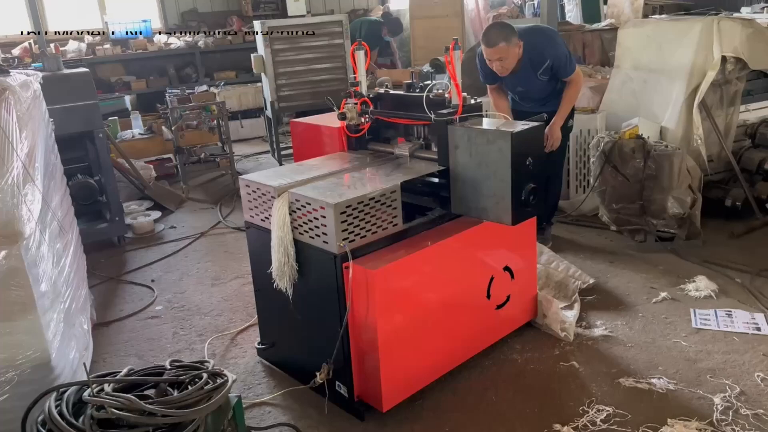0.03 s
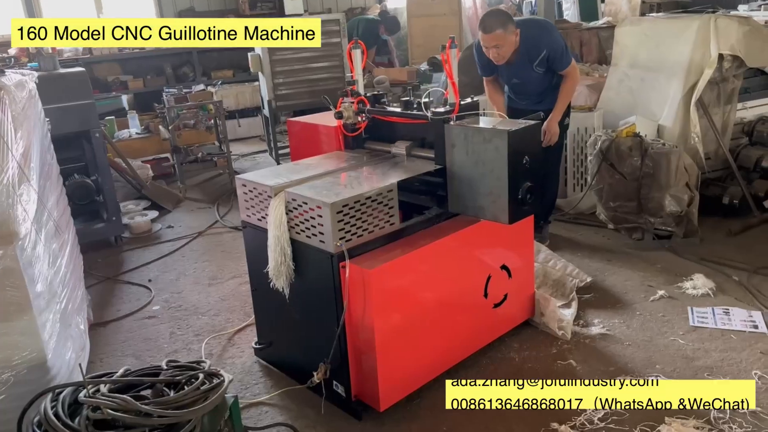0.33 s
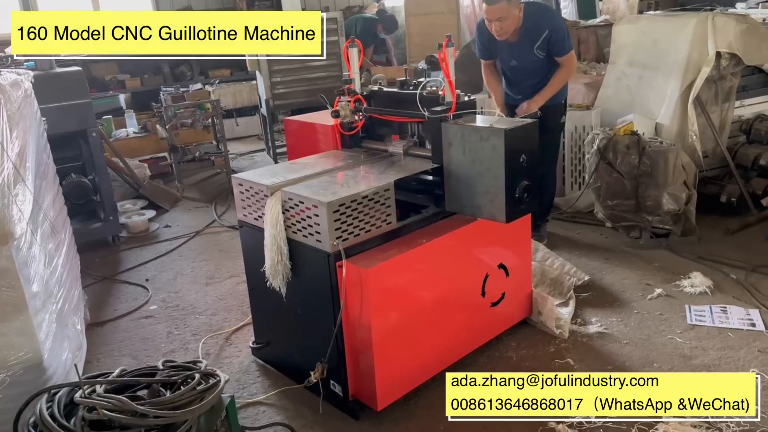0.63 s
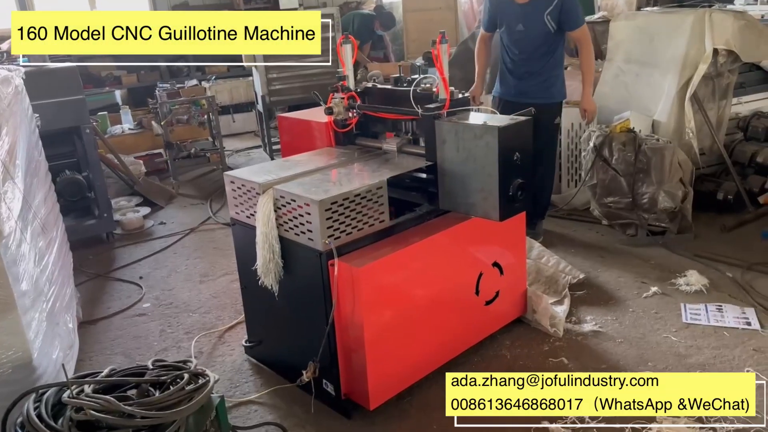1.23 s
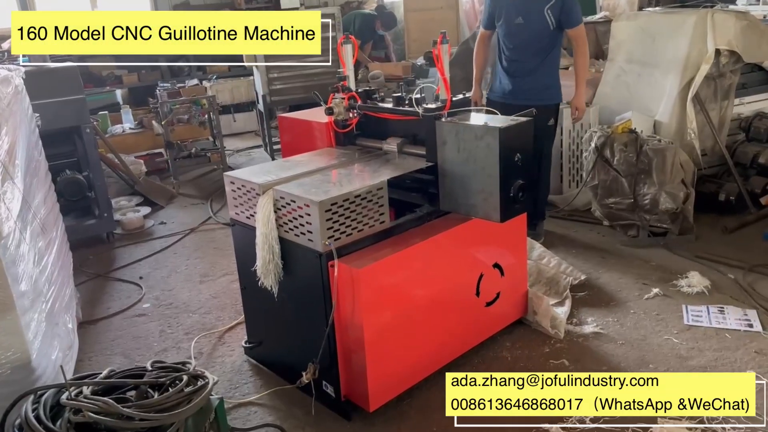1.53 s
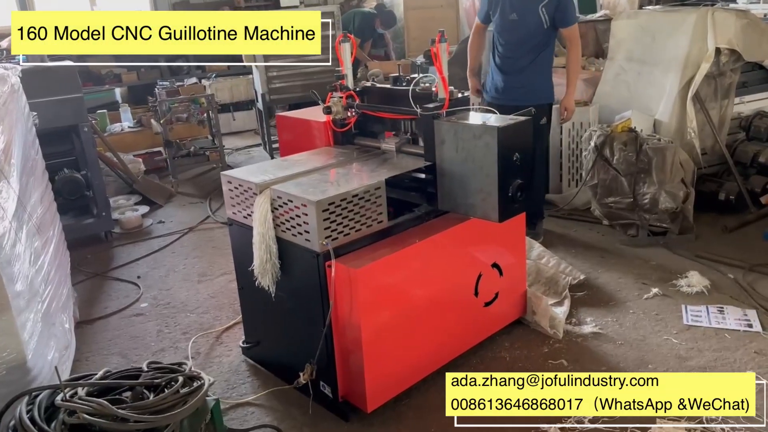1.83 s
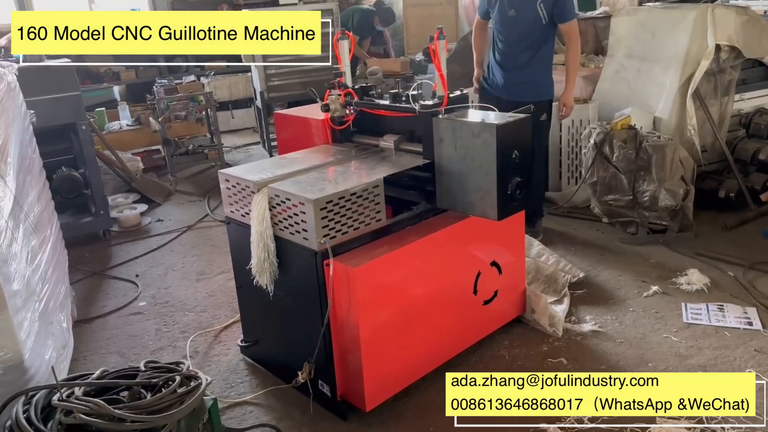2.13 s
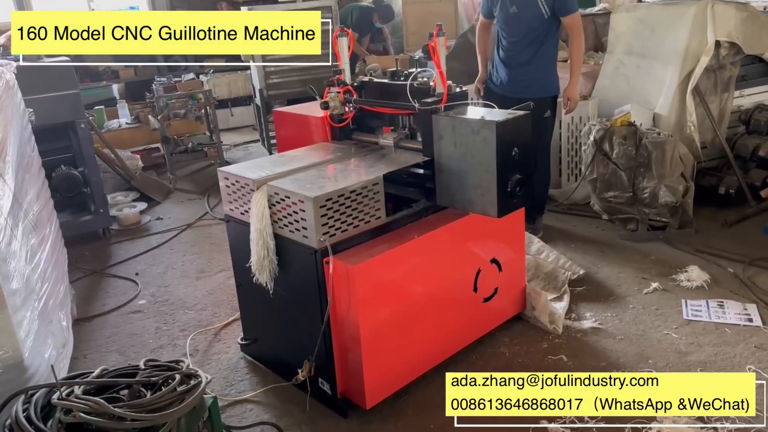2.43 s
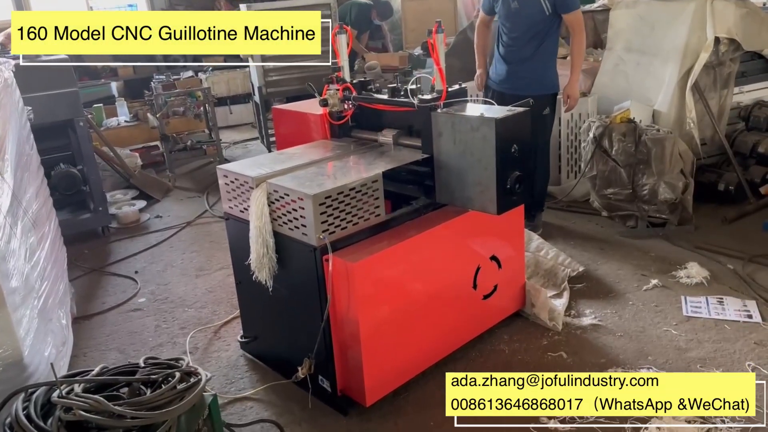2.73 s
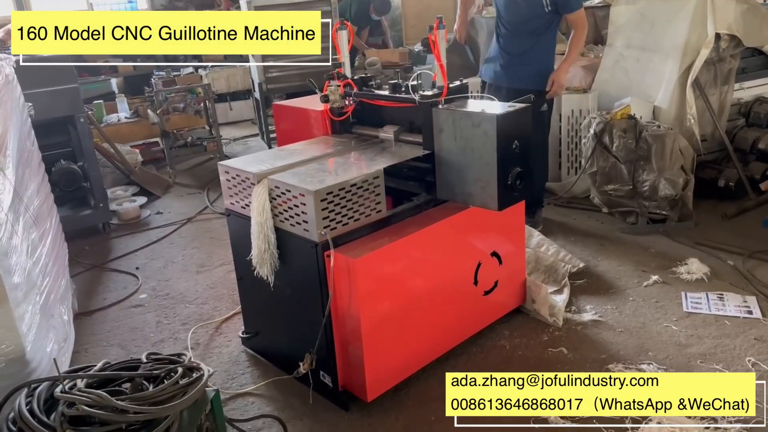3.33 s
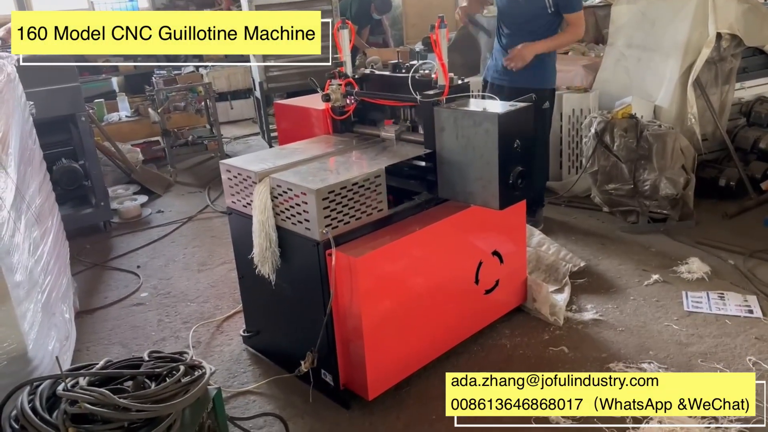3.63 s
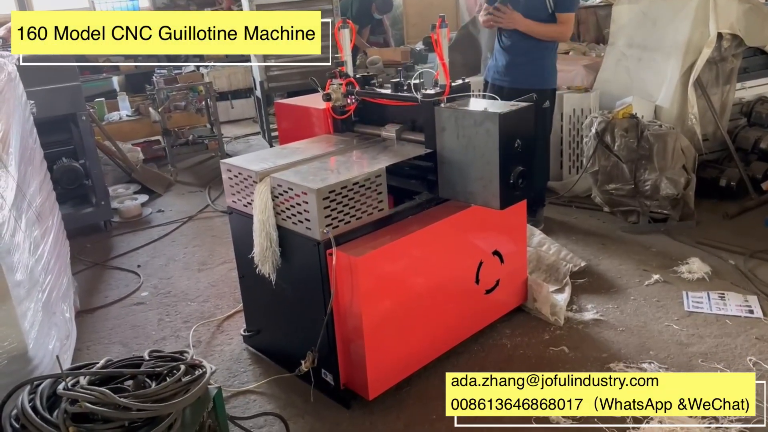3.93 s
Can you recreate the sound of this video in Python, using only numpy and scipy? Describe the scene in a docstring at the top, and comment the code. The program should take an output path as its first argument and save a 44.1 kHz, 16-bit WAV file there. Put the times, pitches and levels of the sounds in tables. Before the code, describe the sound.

A running metal guillotine cutter hums and thumps steadily in a workshop.

```python
"""A guillotine cutter runs in a workshop. From the start its motor hums and whines, its drive rumbles. From
0.35 s a stroke comes every 0.6 s: a dull slap and the same run of soft knocks through the steel frame, with two
bright valve ticks, shaking covers and a short hiss. Scrapes come near 1, 1.5 and 2.8 s. From 2.7 s the loaded
drive churns louder and whirrs, and a rasp climbs through the last scrape. Left and right hear the machine
slightly apart."""
import sys
import numpy as np
from scipy import signal
from scipy.fft import rfft, irfft, next_fast_len
from scipy.io import wavfile
from scipy.ndimage import map_coordinates

SR = 44100
rng = np.random.default_rng(int(sys.argv[2]) if len(sys.argv) > 2 else 0)


def int16_out(signal):
    """Quantize to a 16-bit WAV file."""
    q = np.round(np.clip(np.atleast_2d(signal).T, -1, 1) * 32767)
    wavfile.write(sys.argv[1], SR, q.astype(np.int16))


N = 176400

# Motor tones. Each row: frequency in Hz, level in dB.
HUM_TONES = [(54.5, -38.5), (77, -39.5), (107.7, -51), (183, -40), (360, -43.5), (721.4, -48.5), (899, -55)]
PAIR_TONES = [(1748, -49), (1797, -53)]
HIGH_TONES = [(4893, -65.5), (5712, -64.5), (5835, -67), (5938, -65), (6019, -62), (6062, -60),
              (6158, -66.5), (6202, -67), (6282, -62.5)]
# Swell of the pair and the high tones. Each row: time in seconds, gain in dB.
PAIR_GAIN_DB = [(0, 1.5), (.55, 3), (.72, 9), (.96, 9), (1.05, 1), (1.4, 3), (2.1, 1.5), (2.5, -9),
                (3.2, 2), (4, 1)]
HIGH_GAIN_DB = [(0, 1), (.8, 0.5), (1.4, -1), (2.2, -2.5), (4, -1)]
# Hiss under the high tones. Each row: centre in Hz, half-width in Hz, relative level in dB.
HIGH_HISS_BANDS = [(6110, 180, -7.5), (5880, 130, -6)]
# Motor whine. Each row: time in seconds, pitch in Hz, level in dB, roughness from 0 to 1.
WHINE_TRACK = [(0, 2624, -50, 0.3), (1.1, 2616, -45.5, 0.17), (2, 2626, -47, .25), (2.35, 2597, -50, .8),
               (2.9, 2610, -44.5, 1), (3.2, 2605, -44, .9), (3.52, 2586, -43, .8), (3.65, 2626, -53, .8),
               (4, 2690, -51, 0.88)]

# Noise colours. Each row: frequency in Hz, relative spectral density in dB.
DRIVE_SPECTRUM = [(22, -39.5), (36, -10), (55, -7.5), (90, 1), (170, -1), (230, -2), (400, -2.5), (520, -4),
                  (640, -8.5), (900, -10.5), (1400, -9.5), (2000, -17), (2600, -18), (3400, -26.5),
                  (5000, -30), (6400, -29), (7100, -36), (9800, -37.5), (11000, -60.5), (13000, -46),
                  (14500, -45), (15800, -51)]
TICK_SPECTRUM = [(3000, -12), (7000, -7), (8400, -2), (9600, -0.5), (11500, -10), (13000, -11),
                 (14400, -16), (15700, -4.5)]
SLAP_SPECTRUM = [(120, -25.5), (280, -6), (560, -1.5), (700, -6.5), (1200, -8), (2200, -24), (5000, -48)]
SHUDDER_SPECTRUM = [(30, -33), (70, -32), (110, 3.5), (220, -12), (330, -6), (480, 1), (570, -7),
                    (660, -10.5), (1200, -11), (2000, -19.5), (4000, -31), (8000, -64)]
HISS_SPECTRUM = [(1500, -11.5), (3500, -1.5), (7000, -1), (9500, 4.5), (11500, -24), (13000, -4),
                 (14400, 2), (15700, 2.5)]
CHURN_SPECTRUM = [(120, 2), (270, -7.5), (420, -25), (620, -7), (830, 1), (1250, -3.5), (2000, -11),
                  (3300, -16.5), (5000, -25.5), (8000, -53)]
SCRAPE_SPECTRUM = [(1500, -16.5), (2500, 2), (3500, -1), (4800, -7.5), (9000, -13.5), (12000, -39.5)]
# Ringing steel parts. Each row: centre in Hz, half-width in Hz, relative level in dB.
TICK_RESONANCES = [(8370, 200, -6), (14160, 350, -3.5)]
CHURN_RESONANCES = [(411, 40, -5), (461, 47, -14), (713, 21, -8), (811, 6.1, -9.5), (904, 24, -4.5),
                    (980, 74, -15), (1420, 24, -14.5), (1552, 19, -9.5)]
ROUGH_RESONANCES = [(1140, 26, -1), (1175, 20, 0)]

# Valve ticks. Each row: start in seconds, level in dB, hold in seconds, ring over grit in dB.
VALVE_TICKS = [(0.333, -39.5, 0.014, -9.5), (0.399, -39, 0.0087, -8), (0.938, -39, 0.0094, -7),
               (1, -43, 0.0085, 0), (1.456, -46, .003, -17), (1.536, -38.5, 0.011, -7),
               (1.606, -42, 0.009, -5), (2.133, -40.5, 0.013, -8), (2.203, -39, 0.012, -4.5),
               (2.736, -39.5, 0.01, -2), (2.8, -35, 0.014, -8), (3.334, -42.5, .01, -1.5),
               (3.404, -39.5, 0.012, -2), (3.936, -41.5, 0.017, -3.5)]
# Cutting strokes. Each row: start in seconds, then gains in dB for impacts, shudder, hiss, first blow.
CUT_STROKES = [(0.3452, -1.5, 0, 2, 2.5), (.946, -3, 1, 0, 3), (1.547, -3.5, 0.5, 0.5, 5),
               (2.1455, -3.5, 0, 1, 4), (2.7464, -1, 2, 2, 0), (3.347, -3.5, 0.5, 2, 2),
               (3.9457, -7, 4, 1, 7)]
# Knocks of one stroke. Each row: delay in seconds, gain in dB, pitch the contact favours in Hz.
STROKE_KNOCKS = [(-0.001, -17.5, 357), (0.0047, -18, 547), (0.0104, -15.5, 434), (0.0116, -23.1, 122),
                 (0.0276, -12.5, 156), (0.0298, -20.5, 422), (0.0414, -22.5, 464), (0.0483, -28.0, 123),
                 (0.0609, -19, 214), (0.067, -18.5, 324), (0.0882, -19, 517), (0.0953, -17, 252),
                 (0.113, -20, 92.4), (0.1215, -24.5, 455), (0.1446, -14.5, 378), (0.1508, -24, 452),
                 (0.1544, -17.5, 257), (0.1759, -20.5, 163), (0.2066, -13, 151.4), (0.2235, -19, 408),
                 (0.245, -23.5, 504), (0.2629, -27, 82), (0.335, -27, 540), (0.4087, -32.5, 307)]
# Modes of frame and covers. Each row: frequency in Hz, gain in dB, T60 in seconds.
FRAME_MODES = [(81.4, -4, 0.14), (88.5, 0.5, 0.13), (107.3, 6.5, 0.21), (127, -23, 0.075), (182, 0.7, 0.25),
               (263, -3.5, 0.18), (292.6, -4, 0.1), (324, 2.7, 0.072), (445.7, 2.5, 0.085),
               (522, -0.5, 0.1), (549, -3.5, 0.11)]

# Swell of the churn and the rough ring. Each row: time in seconds, gain in dB.
CHURN_GAIN_DB = [(0, -60), (.85, -43), (1.1, -37.5), (1.45, -35.5), (1.9, -35.5), (2.3, -40), (2.68, -36.5),
                 (2.86, -27), (3.15, -28.5), (3.5, -28), (3.76, -30.5), (4, -34.5)]
ROUGH_GAIN_DB = [(0, -55), (1.7, -41), (2, -34.5), (2.4, -41.5), (2.8, -36), (3.5, -36.5), (4, -36.5)]
# Scrapes. Each row: start in seconds, level in dB, attack and hold in seconds, fall in dB per second.
BLADE_SCRAPES = [(0.957, -47, 0.0089, 0.13, 34), (1.459, -36.5, 0.0089, 0.04, 137),
                 (2.798, -42, 0.024, 0.22, 39)]
# Gliding whirr and rasp. Each row: time in seconds, pitch in Hz, gain in dB.
WHIRR_TRACK = [(2.699, 413, -72), (2.85, 405, -56), (3.051, 414, -35), (3.201, 412, -42.5),
               (3.351, 416, -42), (3.5, 429.4, -38), (3.701, 425, -42.5), (4, 413.3, -52)]
RASP_TRACK = [(2.72, 3300, -70), (2.744, 3200, -40), (2.79, 3120, -38), (2.81, 3400, -46),
              (2.871, 3690, -46), (2.94, 3600, -49), (3.001, 3950, -53), (3.05, 4050, -50),
              (3.11, 4050, -70)]
# Whirr partials. Each row: multiple of the pitch, gain in dB.
WHIRR_HARMONICS = [(1, 7.8), (2, 1.6)]

# Left-right likeness. Each row: frequency in Hz, coherence from 0 to 1.
COHERENCE = [(40, .97), (130, .91), (260, .76), (500, .33), (1000, .12), (4500, .15), (7000, .25),
             (8500, .5), (9900, .55), (10500, .99), (15000, .99)]
# Left ahead of right. Each row: frequency in Hz, phase in radians.
LEFT_LEAD_RAD = [(20, 0), (200, -.1), (500, -.1), (1800, -2.9), (4800, -6.5), (6030, -11.3), (8440, -12.7),
                 (9900, -13.5), (10400, -15.4), (11400, -15.7), (12300, -16.1), (13300, -18.4),
                 (16000, -18.9)]
# Left over right. Each row: frequency in Hz, level in dB.
BALANCE_DB = [(60, -.6), (200, -.6), (700, .5), (2500, 0), (3300, 1.5), (4400, 6), (6100, 9), (6700, 5),
              (7300, 1), (10000, 0)]
# Workshop decay. Each row: frequency in Hz, T60 in seconds.
ROOM_T60_S = [(100, 0.94), (500, 0.3), (2000, 0.35), (10000, 0.33)]

TIME_S = np.arange(N) / SR
SPLIT = np.array([[.5], [-.5]])  # half to the left, minus half to the right


def amp(db):
    """Decibels to gain."""
    return 10 ** (np.asarray(db) / 20)


def unit(x):
    """Scale to rms 1."""
    return x / np.sqrt(np.mean(x ** 2) + 1e-20)


def along(points, hz):
    """Interpolate (Hz, value) points on a log axis."""
    knots_hz, values = np.transpose(points)
    return np.interp(np.log(hz + 1), np.log(np.sort(knots_hz) + 1), values)


def curve(rows):
    """Interpolate (s, value) points."""
    return np.interp(TIME_S, *np.transpose(rows))


def wobble(rate_hz):
    """Smooth random curve, rate_hz knots a second."""
    return map_coordinates(rng.standard_normal(4096), [TIME_S * rate_hz], mode='wrap')


def envelope(start_s, attack_s, hold_s, fall_db_per_s):
    """Rise, hold, steady fall in dB."""
    age_s = np.maximum(TIME_S - start_s, 0)
    return (1 - np.exp(-age_s / attack_s)) * amp(-fall_db_per_s * np.maximum(age_s - hold_s, 0))


def filtered(x, response):
    """Apply a complex frequency response."""
    size = next_fast_len(N + SR // 2)
    return irfft(rfft(x, size) * response(np.fft.rfftfreq(size, 1 / SR)), size)[..., :N]


def spread_rad(hz):
    """Left-right angle; zero when fully coherent."""
    return np.arccos(np.clip(along(COHERENCE, hz), 0, 1))


def stereo(pair):
    """Two unrelated signals to partly coherent left and right."""
    blend = lambda hz: np.array([np.cos(spread_rad(hz) / 2), np.sin(spread_rad(hz) / 2)])
    pan = lambda hz: amp(SPLIT * along(BALANCE_DB, hz)) * np.exp(1j * SPLIT * along(LEFT_LEAD_RAD, hz))
    mid, side = filtered(pair, blend)
    return filtered(np.array([mid + side, mid - side]), pan)


def noise(spectrum):
    """Coloured stereo noise, rms 1."""
    return unit(stereo(filtered(rng.standard_normal((2, N)), lambda hz: amp(along(spectrum, hz)))))


def ringing(resonances):
    """Stereo noise through narrow resonances, rms 1."""
    response = lambda hz: sum(amp(db) / np.sqrt(width_hz) / (1 + 1j * (hz - centre_hz) / width_hz) ** 2
                              for centre_hz, width_hz, db in resonances)
    return unit(stereo(filtered(rng.standard_normal((2, N)), response)))


def tones(rows, drift_rad, flutter_db, rate_hz):
    """Stereo sines, unsteady in phase and level."""
    out = np.zeros((2, N))
    for hz, db in rows:
        phase = 2 * np.pi * (hz * TIME_S + rng.random()) + drift_rad * wobble(rate_hz)
        apart_rad = SPLIT * spread_rad(hz) * (1 + .5 * wobble(rate_hz))
        level_db = db + flutter_db * wobble(rate_hz) + SPLIT * along(BALANCE_DB, hz)
        out += amp(level_db) * np.sin(phase + apart_rad)
    return np.sqrt(2) * out


def motor():
    """Low hum, a whining pair, thin high tones in a narrow hiss."""
    hum = tones(HUM_TONES, drift_rad=0.77, flutter_db=-2.5, rate_hz=9)
    pair = amp(curve(PAIR_GAIN_DB)) * tones(PAIR_TONES, drift_rad=0.69, flutter_db=3, rate_hz=18)
    high = amp(curve(HIGH_GAIN_DB)) * tones(HIGH_TONES, drift_rad=0.46, flutter_db=5.5, rate_hz=32)
    return hum + pair + high + amp(-57) * ringing(HIGH_HISS_BANDS)


def whine(rough_hz=75, swell_db=2.5):
    """Motor tone that sags and roughens under load."""
    knots_s, *columns = np.transpose(WHINE_TRACK)
    hz, db, roughness = (np.interp(TIME_S, knots_s, column) for column in columns)
    phase = 2 * np.pi * np.cumsum(hz) / SR
    sine, cosine = np.sin(phase), np.cos(phase)
    clean = np.sqrt(2) * np.array([sine, cosine])
    rough = unit(np.array([wobble(rough_hz) * sine + wobble(rough_hz) * cosine for _ in range(2)]))
    tone = np.sqrt(1 - roughness) * clean + np.sqrt(roughness) * rough
    return amp(db + swell_db * wobble(14)) * tone


def drive(level_db=-27.5, rattle_db=1, sway_db=1.08):
    """Running drive: rumble with a fast rattle and a slow sway."""
    return amp(level_db + rattle_db * wobble(58.9) + sway_db * wobble(7.87)) * noise(DRIVE_SPECTRUM)


def valve_ticks(flutter_db=1.5):
    """A valve ticks twice a stroke: grit plus a bright ring."""
    grit, ring = noise(TICK_SPECTRUM), ringing(TICK_RESONANCES)
    out = np.zeros((2, N))
    for start_s, db, hold_s, ring_db in VALVE_TICKS:
        burst = envelope(start_s, attack_s=0.0018, hold_s=hold_s, fall_db_per_s=490)
        out += amp(db) * burst * (grit + amp(ring_db) * ring)
    return out * amp(flutter_db * wobble(300))


def slap(level_db=-25):
    """Dull slap of each stroke's first blow."""
    bursts = sum(amp(db + blow_db) * envelope(start_s, attack_s=0.0011, hold_s=0.0073, fall_db_per_s=700)
                 for start_s, db, _, _, blow_db in CUT_STROKES)
    return amp(level_db) * bursts * noise(SLAP_SPECTRUM)


def frame_knocks(attack_s=0.0022, contact_octaves=0.24, first_blow_s=0.009, scatter_db=0.5, room_db=-16):
    """Each knock rings the frame modes near its pitch; the workshop reverberates."""
    age_s = np.arange(SR // 3) / SR
    hz, db, t60_s = np.transpose(FRAME_MODES)[:, :, None]
    rise = 1 - np.exp(-age_s / attack_s)
    modes = rise * amp(db - 60 * age_s / t60_s) * np.sin(2 * np.pi * hz * age_s)
    out = np.zeros(N + SR)
    for start_s, stroke_db, _, _, blow_db in CUT_STROKES:
        for delay_s, knock_db, pitch_hz in STROKE_KNOCKS:
            coupling = np.exp(-.5 * (np.log2(hz[:, 0] / pitch_hz) / contact_octaves) ** 2)
            force_db = stroke_db + knock_db + blow_db * (delay_s < first_blow_s)
            gains = coupling * amp(force_db + scatter_db * rng.standard_normal(len(modes)))
            out[round((start_s + delay_s) * SR):][:len(age_s)] -= gains @ modes
    return out[:N] + amp(room_db) * workshop(out[:N])


def workshop(x):
    """Room reverberation; bass lasts longest."""
    hz, age_s, spectra = signal.stft(rng.standard_normal((2, SR // 2)), SR, nperseg=256)
    decay = amp(-60 * age_s / along(ROOM_T60_S, hz)[:, None])
    _, tail = signal.istft(spectra * decay, SR, nperseg=256)
    return stereo(signal.fftconvolve(x[None], tail / np.linalg.norm(tail[0]), axes=1)[:, :N])


def cover_shudder(level_db=-28.5, repeat_share=0.23):
    """The covers shake after each stroke, partly the same way every time."""
    same, fresh = noise(SHUDDER_SPECTRUM), noise(SHUDDER_SPECTRUM)
    out = np.zeros((2, N))
    for start_s, _, db, _, _ in CUT_STROKES:
        repeated = np.pad(same, ((0, 0), (round(start_s * SR), 0)))[:, :N]
        shake = np.sqrt(repeat_share) * repeated + np.sqrt(1 - repeat_share) * fresh
        burst = envelope(start_s, attack_s=0.0028, hold_s=0.18, fall_db_per_s=43.5)
        out += amp(level_db + db) * burst * shake
    return out


def blade_hiss(level_db=-44, flutter_db=1.3):
    """Fading hiss of the blade on each stroke."""
    bursts = sum(amp(db) * envelope(start_s, attack_s=0.035, hold_s=0.066, fall_db_per_s=45)
                 for start_s, _, _, db, _ in CUT_STROKES)
    return bursts * amp(level_db + flutter_db * wobble(50)) * noise(HISS_SPECTRUM)


def churn(flutter_db=1.63, steel_db=-4.5):
    """The loaded drive churns and sets steel parts ringing."""
    churning = noise(CHURN_SPECTRUM) * amp(flutter_db * wobble(45))
    steel = amp(steel_db) * ringing(CHURN_RESONANCES)
    rough_ring = amp(curve(ROUGH_GAIN_DB)) * ringing(ROUGH_RESONANCES)
    return amp(curve(CHURN_GAIN_DB)) * (churning + steel) + rough_ring


def blade_scrapes(flutter_db=1.2):
    """The blade scrapes now and then: bursts of rough noise."""
    bursts = sum(amp(db) * envelope(start_s, *shape) for start_s, db, *shape in BLADE_SCRAPES)
    return bursts * amp(flutter_db * wobble(91)) * noise(SCRAPE_SPECTRUM)


def whirr(waver_hz=5.7, flutter_db=3, blur_rad=0.26):
    """Wavering pitch of the loaded drive; echoes blur each side separately."""
    knots_s, hz, db = np.transpose(WHIRR_TRACK)
    phase = 2 * np.pi * np.cumsum(np.interp(TIME_S, knots_s, hz) + waver_hz * wobble(25)) / SR
    out = np.zeros((2, N))
    for channel in out:
        for multiple, partial_db in WHIRR_HARMONICS:
            gain = amp(partial_db + flutter_db * wobble(25))
            channel += gain * np.sin(multiple * phase + blur_rad * wobble(30))
    return amp(np.interp(TIME_S, knots_s, db)) * out


def rasp(half_width_hz=190):
    """Narrow noise band climbing unevenly through the last scrape."""
    knots_s, pitch_hz, db = np.transpose(RASP_TRACK)
    band = filtered(rng.standard_normal((2, N)), lambda hz: 1 / (1 + (hz / half_width_hz) ** 2))
    phase = 2 * np.pi * np.cumsum(np.interp(TIME_S, knots_s, pitch_hz)) / SR
    return np.interp(TIME_S, knots_s, amp(db), left=0, right=0) * unit(band * np.sin(phase))


def scene():
    """The whole machine, in stereo."""
    frame = slap() + frame_knocks() + cover_shudder()
    blade = valve_ticks() + blade_hiss() + blade_scrapes() + rasp()
    return frame + blade + drive() + churn() + whirr() + motor() + whine()


def record(dry, low_cut_hz=38, open_s=0.036, fade_s=0.00067, top_hz=15800):
    """Low cut, fast fade-in after a brief silence, band limit."""
    thinned = filtered(dry, lambda hz: hz ** 3 / np.sqrt(hz ** 6 + low_cut_hz ** 6))
    fade_in = np.clip((TIME_S - open_s) / fade_s, 0, 1)
    return filtered(thinned * fade_in, lambda hz: hz < top_hz)


dry = scene()
out = record(dry)
int16_out(out)
```